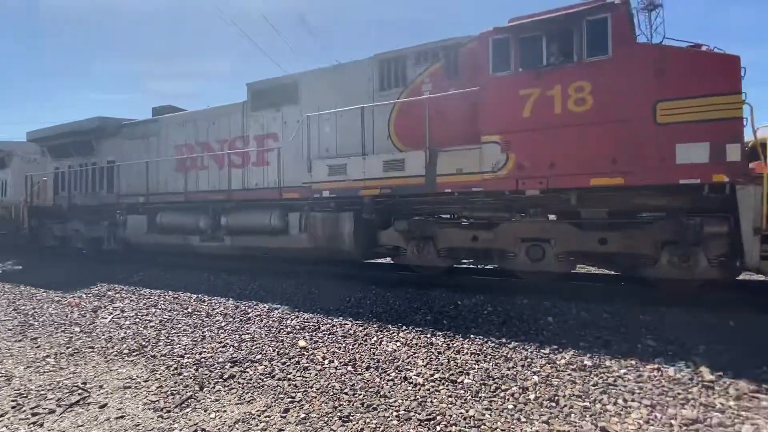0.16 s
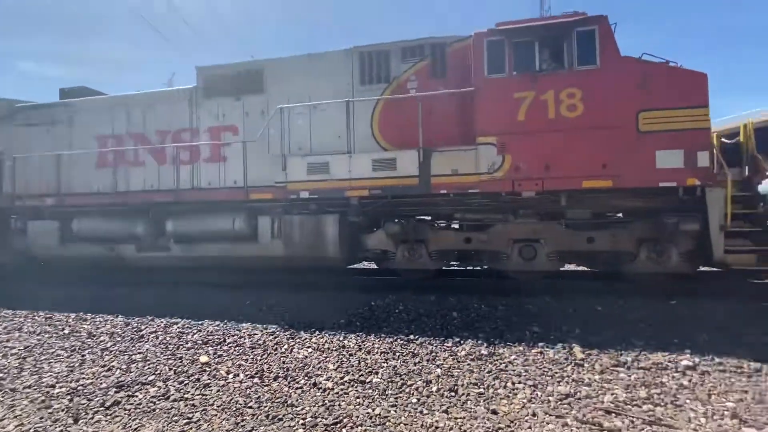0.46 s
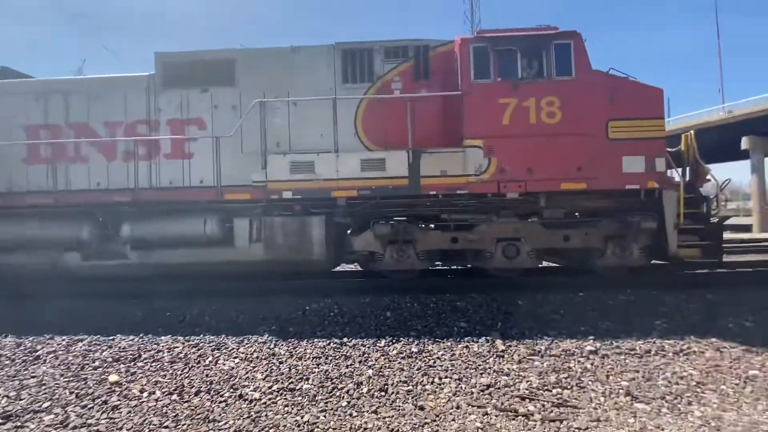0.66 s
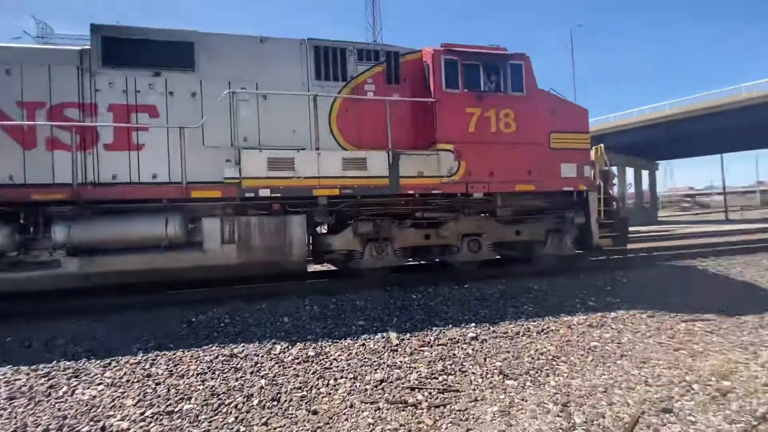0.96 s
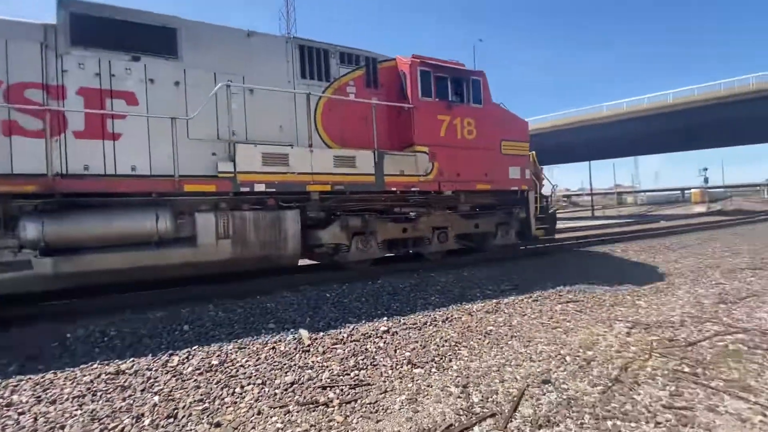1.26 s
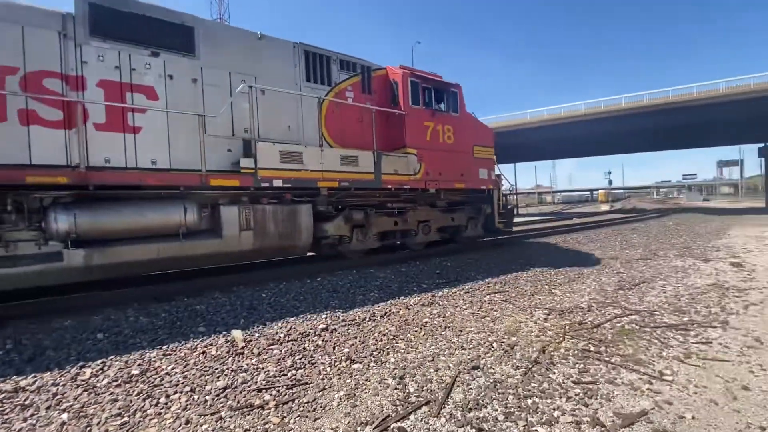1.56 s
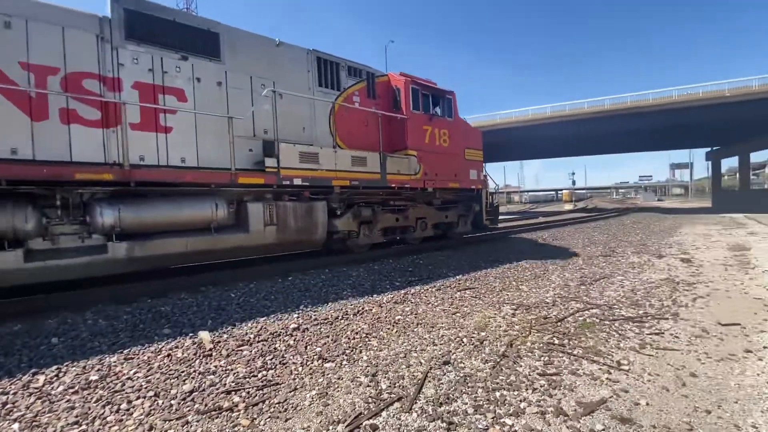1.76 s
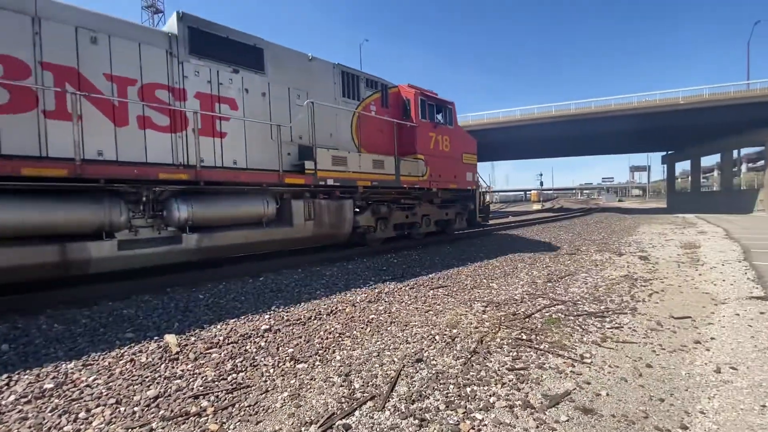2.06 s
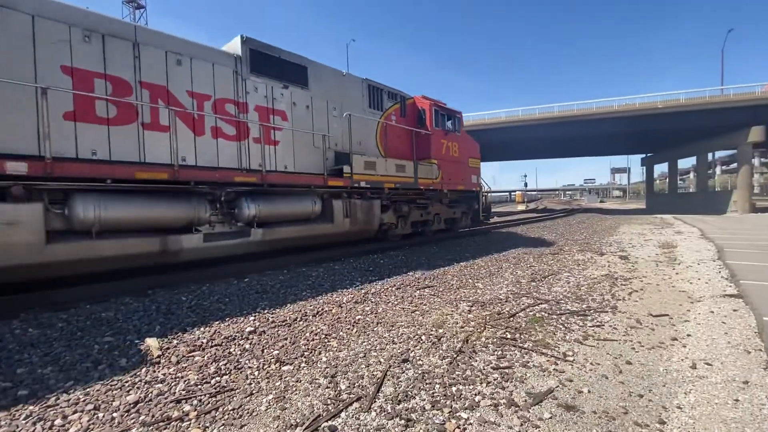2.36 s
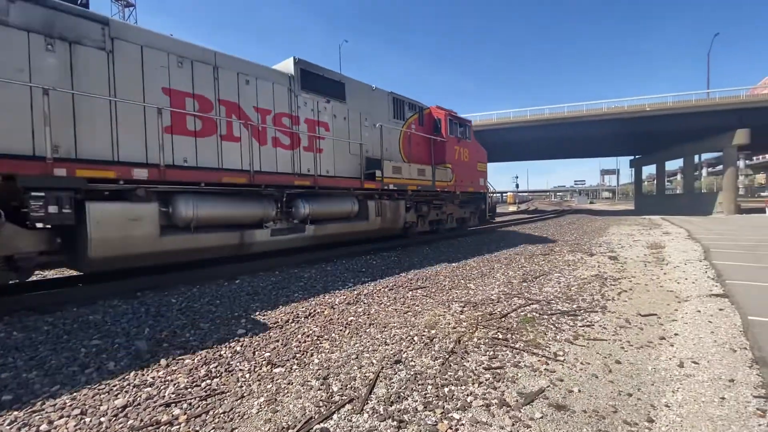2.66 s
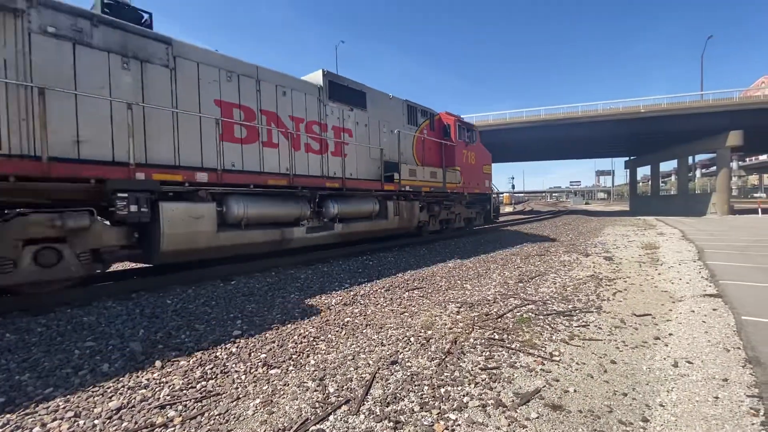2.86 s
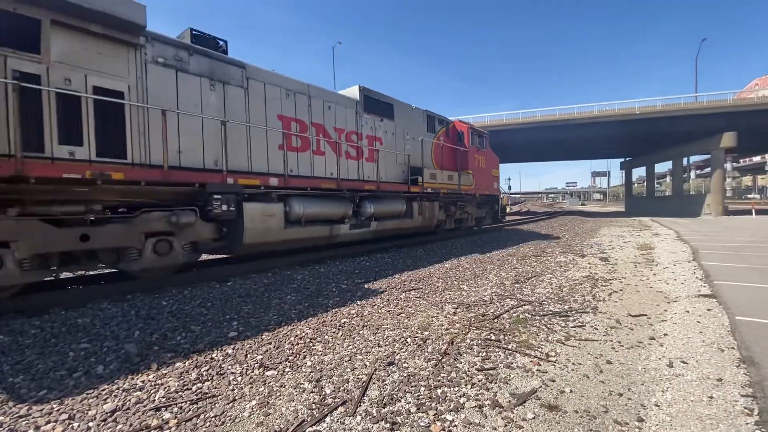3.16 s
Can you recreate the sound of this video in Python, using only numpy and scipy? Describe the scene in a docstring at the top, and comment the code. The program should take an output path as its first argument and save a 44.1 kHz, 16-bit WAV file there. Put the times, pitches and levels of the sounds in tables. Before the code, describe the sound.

A diesel locomotive rumbles past close by, with a wheel squeal and a sharp air burst.

```python
"""A diesel freight locomotive rolls past a handheld stereo recorder by the ballast. From the start the engine
throbs as harmonics of its firing cycle, over exhaust roar, fan hiss and gear whine shaped from noise.
Near 0.5 s a flange squeals in the wheel's modes and scrapes; a knock and a clank ring as damped modes.
Near 2.4 s a valve spits a jet of filtered noise, and the recorder's gain control ducks and recovers."""
import sys
import numpy as np
from scipy import signal
from scipy.fft import rfft, irfft, next_fast_len
from scipy.io import wavfile
from scipy.ndimage import uniform_filter1d, minimum_filter1d, map_coordinates

SR = 44100
rng = np.random.default_rng(int(sys.argv[2]) if len(sys.argv) > 2 else 0)


def generate_wav(sig):
    """Save sig (samples, or channels by samples) to the path in sys.argv[1] as 16-bit PCM at SR."""
    pcm = np.round(np.clip(np.atleast_2d(sig).T, -1, 1) * 32767).astype(np.int16)
    wavfile.write(sys.argv[1], SR, pcm)


def natural_amplitude(level_db):
    """Convert a level in decibels to a linear amplitude factor, elementwise."""
    exponent = np.asarray(level_db, float) / 20
    return 10 ** exponent


N = 145530
T = np.arange(N) / SR

# phase between the microphones for engine and valve, the wheel's sharing its lower part: pitch_hz, left_lead_rad
LEAD_ENGINE = [(0, 0), (400, 1.35), (1290, 3), (2300, 6), (2900, 9.2), (3500, 11.2), (4650, 12.8),
               (6720, 18.9), (8180, 22), (9300, 15.7), (10300, 4 * np.pi), (11800, 4 * np.pi),
               (12500, 3 * np.pi), (13700, 3 * np.pi), (14800, 2 * np.pi)]


def unit(x):
    """Normalization: scale to rms 1."""
    return x / np.sqrt(np.mean(x ** 2) + 1e-20)


def along(points, hz):
    """Interpolation of (hz, value) points on a logarithmic frequency axis."""
    f, v = np.transpose(points)
    return np.interp(np.log(hz + 1), np.log(f + 1), v)


def curves(rows, outside=None):
    """Piecewise linear envelopes: one value per sample for each column after the time."""
    s, *columns = np.transpose(rows)
    return [np.interp(T, s, column, outside, outside) for column in columns]


def wobble(rate):
    """Band-limited random modulation: a smooth curve through rate random knots a second."""
    coarse = T[::16]
    knots = rng.standard_normal(int(N * rate / SR) + 4)
    return np.interp(T, coarse, map_coordinates(knots, [coarse * rate]))


def filtered(x, response):
    """Linear filtering: the spectrum of x times a complex response of frequency."""
    m = next_fast_len(N + 8192)
    return irfft(rfft(x, m) * response(np.fft.rfftfreq(m, 1 / SR)), m)[..., :N]


def peaked(x, peaks):
    """Second-order resonance: x plus its band-pass response at each (hz, width_hz, gain_db)."""
    def response(f):
        return 1 + sum(natural_amplitude(db) * 1j * f * width / (hz * hz - f * f + 1j * f * width)
                       for hz, width, db in peaks)
    return filtered(x, response)


def rush(spectrum, patchy_db):
    """Turbulence noise: two unrelated coloured noises with shared random patches of gain, rms 1."""
    z = signal.stft(rng.standard_normal((2, N)), nperseg=512)[2]
    field = uniform_filter1d(rng.standard_normal(z.shape[1:]), size=6, axis=0)
    field = uniform_filter1d(field, size=10, axis=1)
    pair = signal.istft(z * natural_amplitude(patchy_db * unit(field)), nperseg=512)[1][:, :N]
    return unit(filtered(pair, lambda hz: natural_amplitude(along(spectrum, hz))))


def narrow(hz, width_hz):
    """Narrow-band resonance: a pair of steady tones plus slow random quadratures, rms 1."""
    steady = 1.5
    slow = np.array([[steady + wobble(width_hz), wobble(width_hz)] for _ in range(2)])
    phase = 2 * np.pi * np.cumsum(hz + width_hz / 4 * wobble(10)) / SR
    return unit(slow[:, 0] * np.cos(phase) + slow[:, 1] * np.sin(phase))


def struck(s, db, modes, attack_s):
    """Modal decay: one blow rings (hz, level_db, t60_s) modes, their phase a little unsteady."""
    t = np.clip(T - s, 0, None)
    ringing = sum(natural_amplitude(level - 60 * t / t60) * np.sin(2 * np.pi * hz * t + wobble(65))
                  for hz, level, t60 in modes)
    return natural_amplitude(db) * (1 - np.exp(-t / attack_s)) * ringing


def throb(phase):
    """Harmonic synthesis: engine orders are multiples of the firing cycle, each wavering, rms 1."""
    # order levels from the fifth up, exhaust side facing the microphones: level_db
    facing = [-9, -10, -19, -2, -1, -8, 0, -10, -10, -6, -7, -8, -19, -19, -20, -10, -9, -13, -9, -21, -19,
              -12, -19, -24]
    # the same orders once that side has turned away: level_db
    turned_away = [-8, -5, -11, -3, -6, -6, -4, -4, -3.5, -11, -13, -11, -10, -10, -15, -9, -12, -8, -8,
                   -17, -14, -9, -14, -20]
    first_order, turns_s, turn_takes_s = 5, .55, .15
    waver_db, drift_rad = 2, .3
    away = np.clip((T - turns_s) / turn_takes_s, 0, 1)
    lines = []
    for order, (facing_db, away_db) in enumerate(zip(facing, turned_away), first_order):
        level_db = facing_db + away * (away_db - facing_db) + waver_db * wobble(2.51)
        angle = order * phase + rng.uniform(0, 2 * np.pi) + drift_rad * wobble(2.87)
        lines.append(natural_amplitude(level_db) * np.exp(1j * angle))
    # every other order also reaches the scattered sound, in quadrature
    return unit(np.array([np.real(sum(lines)), np.imag(sum(lines[::2]))]))


def gear_whine():
    """Gear meshing: a pair of narrow resonances gliding in pitch and level."""
    # gear pair: first_hz, last_hz, width_hz, first_db, last_db
    gears = [(968, 955, 11, 1, -12), (1012, 983, 11, -2, 3)]
    gone = T / T[-1]
    return sum(natural_amplitude(db + (last_db - db) * gone) * narrow(first_hz + (last_hz - first_hz) * gone, width_hz)
               for first_hz, last_hz, width_hz, db, last_db in gears)


def faint_whines():
    """Narrow-band tones whose pitch sinks as the engine draws away."""
    # fainter whines: first_hz, width_hz, first_db, last_db
    whines = [(615, 26, -33, -40), (1787, 20, -35, -37), (2135, 40, -54, -40), (4525, 50, -49, -48)]
    sink = .027  # share of the pitch lost by the end
    gone = T / T[-1]
    return sum(natural_amplitude(db + (last_db - db) * gone + 2 * wobble(15)) * narrow(hz * (1 - sink * gone), width_hz)
               for hz, width_hz, db, last_db in whines)


def engine():
    """Superposition: harmonic throb and hum, turbulent rumble, roar and hiss, and narrow-band whines."""
    # firing cycle, sinking as the engine draws away: time_s, cycle_hz
    firing = [(0, 8.39), (1.1, 8.36), (2.3, 8.33), (2.9, 8.26), (3.3, 8.24)]
    # engine layers: time_s, bass_db, roar_db, fan_hiss_db, hum_db, gear_whine_db
    layers = [(0, -17, -21, -32, -17, -28.5), (.25, -14.5, -20, -33.5, -17.5, -29.5),
              (.5, -15, -19.5, -32.5, -18, -31.5), (.6, -19.5, -25, -36, -39, -28),
              (.8, -18.5, -23.5, -33.5, -30.5, -34), (1.1, -18.5, -24, -38, -20, -37.5),
              (1.5, -18.5, -23.5, -39, -36, -32.5), (1.9, -17.5, -23.5, -37.5, -44, -39),
              (2.3, -17.5, -24, -35.5, -40, -33.5), (2.7, -20.5, -27, -42, -53, -41.5),
              (2.85, -18.5, -24, -36, -38, -31), (3.3, -17.5, -25, -37.5, -33, -39)]
    # noise spectra, relative density: pitch_hz, level_db
    rumble_spectrum = [(15, -28), (25, -76), (70, -3.5), (108, -1.5), (209, -6.5), (365, -10.5),
                       (400, -13.5), (520, -17), (880, -120)]
    roar_spectrum = [(150, -87), (250, -2), (438, -11), (491, -5), (826, -11), (976, -9), (1320, -15),
                     (1780, -12), (1900, -15), (3000, -31), (3900, -34.5), (6600, -120)]
    hiss_spectrum = [(1470, -25), (2500, -7), (4110, -6.5), (4510, -5.5), (6920, -9.5), (7830, -11),
                     (10500, -12.5), (13000, -19.5), (14200, -19), (16000, -23)]
    throb_db, rumble_db, hum_order, hum_knots_hz = -1.5, -7, 29, 2.5
    cycle_hz, = curves(firing)
    bass_db, roar_db, hiss_db, hum_db, gear_db = curves(layers)
    phase = 2 * np.pi * np.cumsum(cycle_hz) / SR
    rumble = natural_amplitude(rumble_db + 2.5 * wobble(8.42)) * rush(rumble_spectrum, patchy_db=-2.0)
    bass = natural_amplitude(bass_db) * (natural_amplitude(throb_db) * throb(phase) + rumble)
    # roar and hiss swell together, partly twice a cycle
    shared_db = 0.78 * wobble(8.845) + 0.32 * np.cos(2 * phase)
    roar = natural_amplitude(roar_db + shared_db) * rush(roar_spectrum, patchy_db=1.14)
    hiss = natural_amplitude(hiss_db + shared_db + 0.7 * wobble(24.32)) * rush(hiss_spectrum, patchy_db=2.0)
    hum = natural_amplitude(hum_db + 0.83 * wobble(3.3)) * np.sin(hum_order * phase + 0.47 * wobble(hum_knots_hz))
    hum_pair = hum * [[1], [.3]]  # direct, scattered
    whines = natural_amplitude(roar_db - roar_db.mean()) * faint_whines()  # they follow the roar's swings
    return bass + roar + hiss + hum_pair + natural_amplitude(gear_db) * gear_whine() + whines


def squeal():
    """Friction-excited vibration: the flange sings in narrow wheel modes with a noisy rasp."""
    # squeal envelope: time_s, level_db
    envelope = [(.485, -64), (.51, -30.5), (.6, -33), (.75, -33.5), (.83, -28), (.97, -28), (1.05, -35.5),
                (1.2, -48), (1.5, -77)]
    # wheel modes: pitch_hz, width_hz, level_db at the loudest, share of the squeal's swings followed
    wheel_modes = [(6869, 30, -11, .35), (12592, 24, -3, 1), (12672, 18, -1, 1), (14500, 50, -10, .55)]
    # rasp noise, relative density: pitch_hz, level_db
    rasp_spectrum = [(8000, -30), (11500, -11), (12600, 13), (14500, 6), (15700, -21)]
    level_db, = curves(envelope, -120)
    top_db = level_db.max()
    modes = sum(natural_amplitude(top_db + db + share * (level_db - top_db) + wobble(8.2)) * narrow(hz, width_hz)
                for hz, width_hz, db, share in wheel_modes)
    begun = T > envelope[0][0]
    return begun * modes + natural_amplitude(level_db) * rush(rasp_spectrum, patchy_db=2.5)


def scrapes():
    """Friction noise: short rough bursts with exponential decay, coloured by wheel resonances."""
    # flange scrapes: start_s, rise_s, hold_s, t60_s, level_db, treble_tilt_db (per octave about 10 kHz)
    bursts = [(0.487, 0.0063, 0.053, 0.43, -16, 18), (0.505, 0.025, 0.041, 0.17, -21.5, -1),
              (.809, .001, .012, .15, -24, -8), (0.903, 0.013, 0.025, 0.24, -29.5, -2),
              (1.461, 0.0018, 0.0072, 0.071, -34.5, -3), (2.083, 0.011, 0.041, 0.22, -42, 7)]
    # scrape noise, relative density: pitch_hz, level_db
    scrape_spectrum = [(1500, -24), (2500, -12), (6000, -10), (9000, -7), (11000, 0), (13000, -3),
                       (15800, -3)]
    # wheel resonances: pitch_hz, width_hz, gain_db
    resonances = [(10530, 60, 10), (11360, 70, 10), (12190, 60, 5), (13770, 60, 9), (14510, 100, 10)]
    total = 0
    for start, rise, hold, t60, db, tilt_db in bursts:
        t = T - start
        shape = np.clip(t / rise, 0, 1) * natural_amplitude(-60 * np.clip(t - rise - hold, 0, None) / t60)
        colour = [(hz, level + tilt_db * np.log2(hz / 10000)) for hz, level in scrape_spectrum]
        total = total + natural_amplitude(db + 1.9 * wobble(140)) * shape * rush(colour, patchy_db=6.5)
    return peaked(total, resonances)


def knock_and_clank():
    """Impact excitation: two blows ring damped modes, as direct sound only."""
    # modes of each blow: pitch_hz, level_db, t60_s
    knock_modes = [(1575, 7, 0.08), (2070, -6, 0.057)]
    clank_modes = [(2300, -1, .1), (3340, -1, .2), (4090, -10, .5), (4740, 1, .08), (5160, -4, .6),
                   (5350, -1, .5), (5710, 3, .12)]
    knock = struck(.55, -15, knock_modes, attack_s=0.0023)
    clank = struck(.809, -26, clank_modes, attack_s=0.00035)
    return (knock + clank) * [[1], [0]]


def wheel():
    """Superposition of the wheel's squeal and scrapes with the two blows."""
    return squeal() + scrapes() + knock_and_clank()


def air():
    """Jet turbulence: a burst of noise from the valve whose low body fades sooner than the hiss."""
    # air release: time_s, level_db
    release = [(2.335, -32), (2.36, -19.5), (2.395, -7.5), (2.425, -10), (2.45, -14), (2.55, -22),
               (2.7, -31.5), (2.8, -37)]
    # jet noise, relative density: pitch_hz, level_db
    jet_spectrum = [(240, -43), (400, -13), (607, -5), (826, -15), (935, -7), (1180, -20), (1440, -6),
                    (1960, -10.5), (2880, -13), (4730, -20), (11800, -18), (13100, -18.5), (16000, -23)]
    # valve mouth resonances: pitch_hz, width_hz, gain_db
    mouth = [(1967, 120, 5), (4800, 250, 3)]
    body_below_hz, body_extra_fade = 1250, .3  # extra dB of fall per dB of the release
    level_db, = curves(release, -120)
    jet = natural_amplitude(1.5 * wobble(120)) * rush(jet_spectrum, patchy_db=2.5)
    body = filtered(jet, lambda hz: hz < body_below_hz)
    faded_body = natural_amplitude(body_extra_fade * (level_db - level_db.max())) * body
    return peaked(natural_amplitude(level_db) * (jet - body + faded_body), mouth)


def heard(pair, lead):
    """Interchannel coherence: direct and scattered sound mix at two microphones with phase and level."""
    # likeness of the microphones: pitch_hz, likeness (0-1)
    likeness = [(100, .96), (300, .92), (800, .8), (1500, .72), (3000, .55), (9500, .55), (10300, 1),
                (16000, 1)]
    # level difference: pitch_hz, left_over_right_db
    tilt = [(60, -7), (200, -6.5), (450, -2.5), (900, .5), (2200, -2), (3300, 5), (4600, 0), (8100, -3),
            (10300, 0)]

    def blend(hz):
        angle = np.arccos(np.clip(along(likeness, hz), 0, 1)) / 2
        return np.array([np.cos(angle), np.sin(angle)])

    direct, scattered = filtered(pair, blend)
    sign = np.array([[1], [-1]])  # left, right

    def difference(hz):
        phase = np.interp(hz, *np.transpose(lead))
        return natural_amplitude(sign * along(tilt, hz) / 2) * np.exp(.5j * sign * phase)

    return filtered(direct + sign * scattered, difference)


def turned(pair):
    """Time difference of arrival: below 6 kHz the left-right delay follows the engine's bearing."""
    # bearing, beyond the fixed phase lead: time_s, left_lead_s
    bearing = [(0, -.00025), (.5, 0), (2.3, 0), (3.3, -.0002)]
    lead_s, = curves(bearing)
    low = filtered(pair, lambda hz: hz < 6000)
    moved = [map_coordinates(channel, [(T + side * lead_s / 2) * SR], mode="nearest")
             for channel, side in zip(low, (1, -1))]
    return pair - low + moved


def scene():
    """Superposition of all sources at the microphone pair."""
    # phase between the microphones for the wheel: pitch_hz, left_lead_rad
    lead_wheel = LEAD_ENGINE[:-4] + [(11700, 4 * np.pi), (13150, 3 * np.pi), (13650, 3 * np.pi),
                  (13800, 2.5 * np.pi), (15200, 2 * np.pi)]
    passing = turned(heard(engine(), LEAD_ENGINE))
    return passing + heard(wheel(), lead_wheel) + heard(air(), LEAD_ENGINE)


def roll_off(x):
    """The treble ends steeply here."""
    return signal.sosfilt(signal.butter(12, 16480, fs=SR, output="sos"), x)


def record(dry):
    """Dynamic range compression: mid-band level drives a gain that ducks, holds and recovers; soft clip."""
    duck_over_db, duck_ratio = -18.5, 0.89
    hold_s, recover_db_s, smooth_s = .13, 52, 0.022
    sensed = filtered(dry, lambda hz: (hz > 1300) * (hz < 6000))
    power = uniform_filter1d((sensed ** 2).mean(0), size=1300)
    level_db = 10 * np.log10(np.abs(power) + 1e-12)
    need_db = duck_ratio * np.clip(level_db - duck_over_db, 0, None)
    # after the hold, the cut recovers along a straight slope in dB
    late_db = np.interp(T - hold_s, T, need_db)
    slope_db = recover_db_s * T
    recovering_db = np.maximum(np.maximum.accumulate(late_db + slope_db) - slope_db, 0)
    # running maximum over the past hold time
    half = round(hold_s * SR / 2)
    held_db = -minimum_filter1d(-need_db, size=2 * half + 1, origin=half)
    keep = np.exp(-1 / (smooth_s * SR))
    cut_db = signal.lfilter([1 - keep], [1, -keep], np.maximum(recovering_db, held_db))
    ducked = filtered(dry * natural_amplitude(-cut_db), lambda hz: hz < 15900)
    clipped = ducked / (1 + np.abs(ducked) ** 6) ** (1 / 6)
    return roll_off(clipped)


dry = scene()
out = record(dry)
generate_wav(out)
```